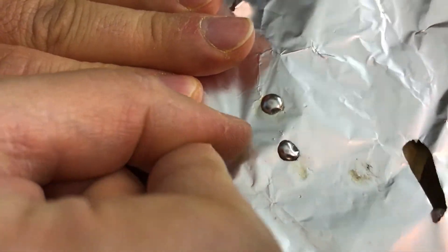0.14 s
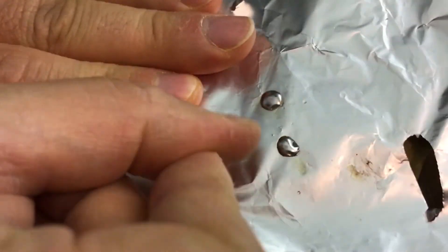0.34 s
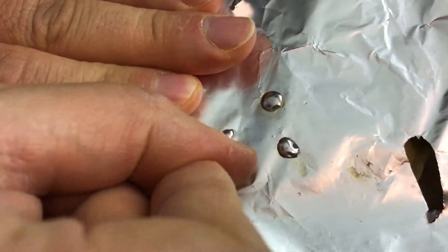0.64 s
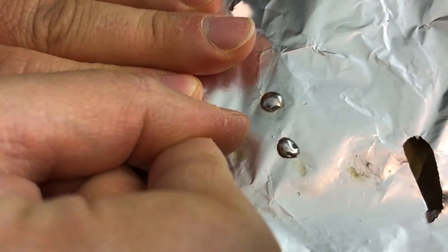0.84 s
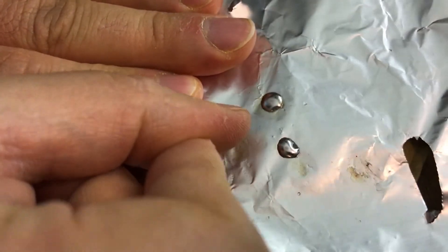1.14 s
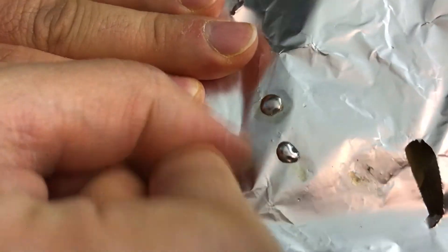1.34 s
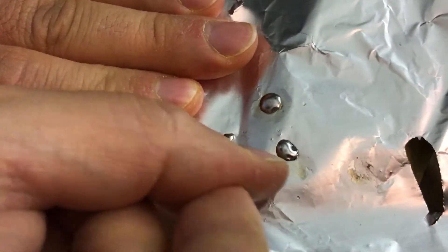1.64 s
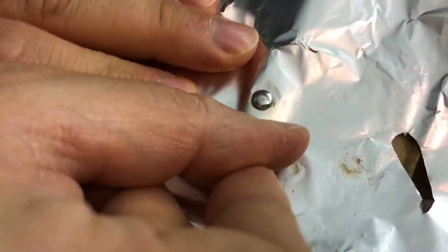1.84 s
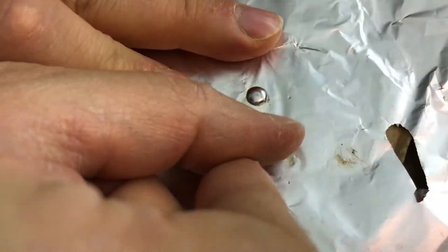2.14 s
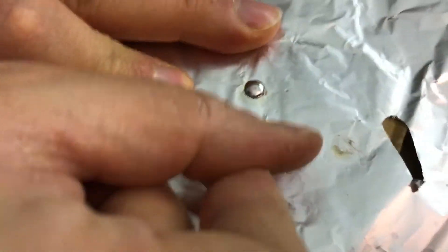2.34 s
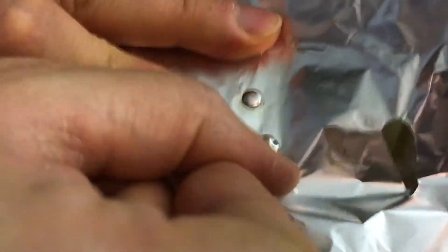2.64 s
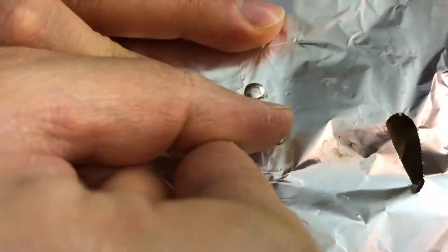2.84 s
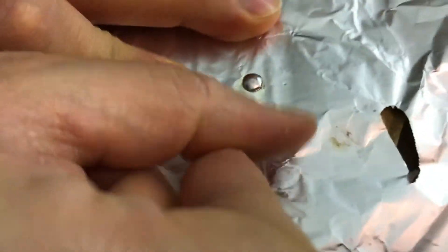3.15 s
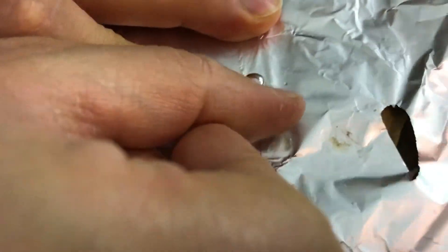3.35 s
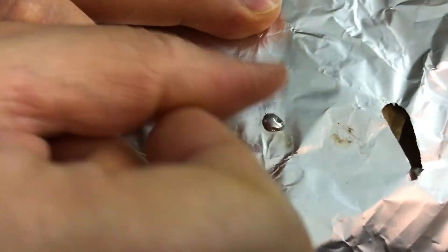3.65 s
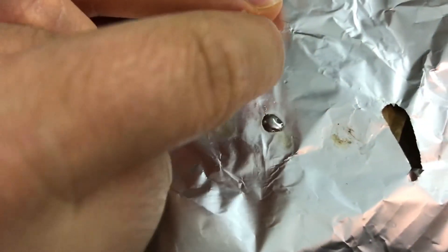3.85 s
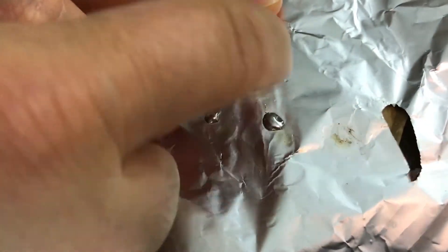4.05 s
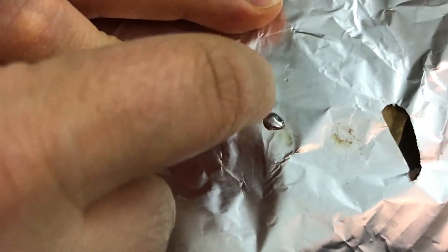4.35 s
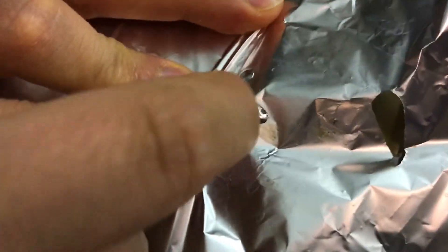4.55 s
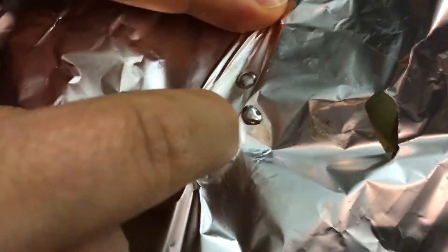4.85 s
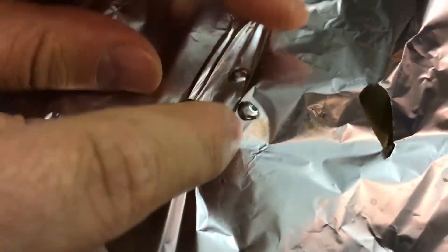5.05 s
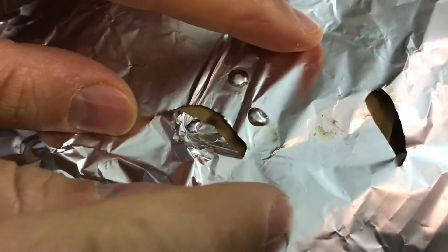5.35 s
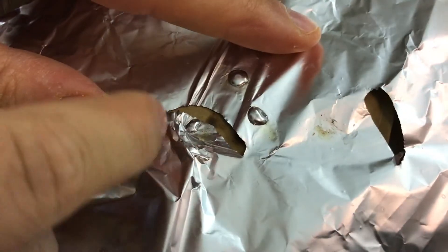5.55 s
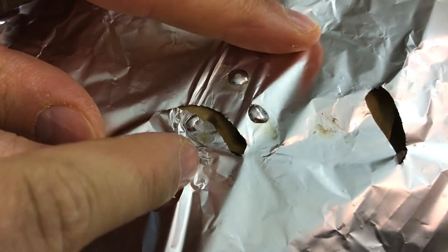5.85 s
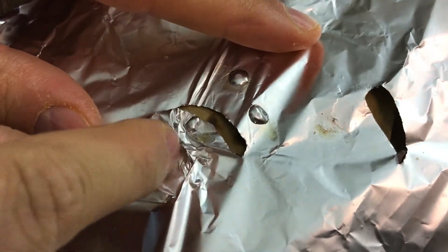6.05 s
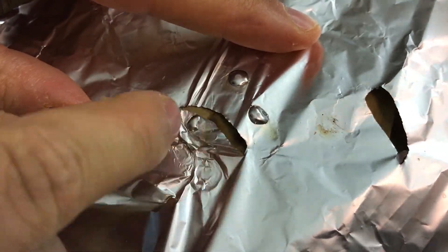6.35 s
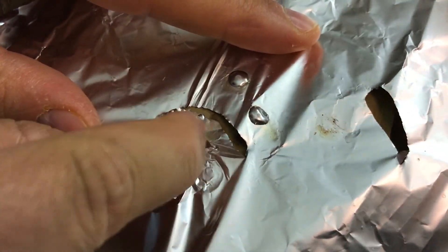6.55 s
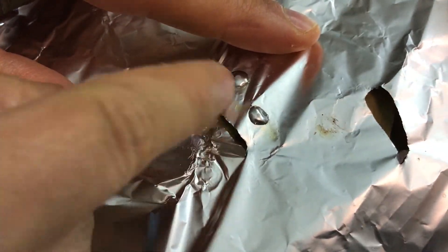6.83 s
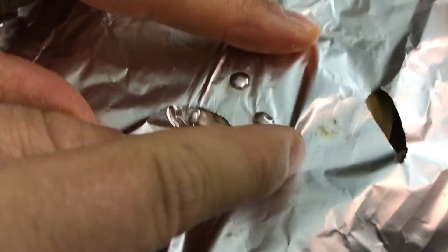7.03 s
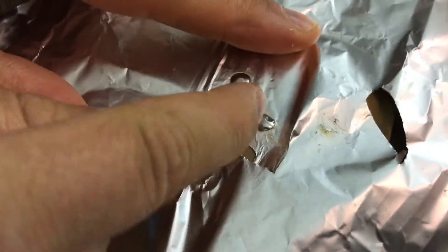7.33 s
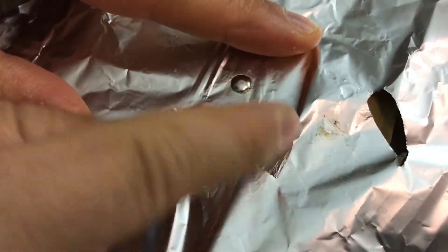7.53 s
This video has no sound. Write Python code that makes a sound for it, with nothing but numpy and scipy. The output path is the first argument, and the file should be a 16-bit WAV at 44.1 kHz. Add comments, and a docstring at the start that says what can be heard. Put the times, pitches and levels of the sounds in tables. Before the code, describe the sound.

Very close to the microphone, fingers work a sheet of kitchen foil on a workbench. Eight taps in the first three and a half seconds clack and thump, each with a splash of crinkle, between rubbing strokes. Then the foil is lifted and bent with sharper snaps, rips briefly near five seconds, and keeps crackling to the end. Faint steady hum, small dry room.

```python
"""Under a steady faint room hum, kitchen foil on a workbench snaps and crackles throughout, near the microphone.
Eight taps fall among the strokes in the first three and a half seconds: each thumps the bench, clacks,
squeezes out air and collapses the foil around the finger. Creases buckle and ring briefly as shaped noise bursts,
a sliding finger gives modulated noise, a few wide facets ring on one note, and a rip is a run of small jerks.
A short diffuse tail of the room follows the sounds of foil and bench."""
import sys
import numpy as np
from scipy import signal
from scipy.fft import rfft, irfft, next_fast_len
from scipy.io import wavfile
from scipy.ndimage import uniform_filter1d, map_coordinates

SR = 44100
rng = np.random.default_rng(int(sys.argv[2]) if len(sys.argv) > 2 else 0)


def wrap_up_sound(samples):
    """Save the sound to the file named by the first command line argument, as 16-bit audio."""
    columns = np.atleast_2d(samples).T
    # keep every value between -1 and 1, then stretch to whole-number steps
    tamed = np.clip(columns, -1, 1)
    steps = np.round(tamed * 32767).astype(np.int16)
    wavfile.write(sys.argv[1], SR, steps)


N = 339084
TOP_HZ = 15750  # upper band limit


def amp(db):
    """Logarithmic level: decibels to amplitude gain."""
    return 10 ** (np.asarray(db) / 20)


def unit(x):
    """Power normalisation: each row at rms 1."""
    return x / np.sqrt(np.mean(x ** 2, axis=-1, keepdims=True) + 1e-20)


def along(points, hz):
    """Logarithmic frequency scale: (f/Hz, value) points interpolated along it."""
    f, v = np.transpose(points)
    return np.interp(np.log(hz + 1), np.log(f), v)


def curve(rows):
    """Linear interpolation in time: (t/s, value) rows as one value per sample."""
    return np.interp(np.arange(N) / SR, *np.transpose(rows))


def filtered(x, gain):
    """Minimum-phase filtering: folding the cepstrum makes a causal filter of a gain per frequency."""
    m = 2 * next_fast_len(N // 2 + SR // 4)
    log_gain = np.log(np.maximum(gain(np.fft.rfftfreq(m, 1 / SR)), 1e-6))
    cepstrum = irfft(log_gain)
    # doubles positive times and removes negative ones
    fold = 1 + np.sign(m // 2 - np.arange(m)) * (np.arange(m) > 0)
    response = np.exp(rfft(cepstrum * fold))
    return irfft(rfft(x, m) * response, m)[:N]


def coloured(x, spectrum):
    """Spectral shaping: x takes on the spectrum, while white noise keeps its power."""
    in_band = amp(along(spectrum, np.arange(TOP_HZ)))
    norm = np.sqrt(np.mean(in_band ** 2) * TOP_HZ / (SR / 2))
    return filtered(x, lambda hz: amp(along(spectrum, hz)) / norm)


def place(times, sounds):
    """Superposition: the rows of sounds are summed, each starting at its time."""
    starts = np.round(np.maximum(times, 0) * SR).astype(int)
    index = starts[:, None] + np.arange(sounds.shape[1])
    return np.bincount(index.ravel(), sounds.ravel(), N)[:N]


def band(x, lo_hz, hi_hz):
    """Band limitation: a gentle band-pass."""
    return signal.sosfilt(signal.butter(2, [lo_hz, hi_hz], "bandpass", fs=SR, output="sos"), x)


def wobble(rate):
    """Band-limited fluctuation: a smooth random curve with rate knots a second."""
    knots = rng.standard_normal(int(N * rate / SR) + 4)
    return map_coordinates(knots, [np.arange(N) * rate / SR])


# background spectrum of the room: f/Hz, relative density level/dB
HUM_SPECTRUM = [(20, -39), (50, 5), (85, -13), (120, -3), (160, -14), (235, -2.5), (330, -11), (480, -24.5),
                (700, -20), (1200, -20.5), (4000, -29), (15000, -43.5)]


def background_hum():
    """Stationary noise: the room's steady background is white noise shaped by its spectrum."""
    return amp(-67.5) * coloured(rng.standard_normal(N), HUM_SPECTRUM)


def facets(count, ripple_db, tilt_db, size=2048):
    """Modal density: every facet has its own crowd of resonances and brightness (dB per octave), one per row."""
    hz = np.fft.rfftfreq(size, 1 / SR)
    ripple = signal.resample(rng.standard_normal((count, 64)), len(hz), axis=1)
    octaves = np.log2((hz + 1000) / 6000)
    gain = amp(ripple_db * ripple + tilt_db[:, None] * octaves)
    return unit(irfft(rfft(rng.standard_normal((count, size))) * gain))


def buckles(times, db, tilt_db, attack, t60, ring_db, ring_t60, ripple_db, brittle=0.3):
    """Snap-through: a facet flips with a crack, then bending waves die away; bright small facets die soonest."""
    ring = facets(len(times), ripple_db, tilt_db)
    t = np.arange(ring.shape[1]) / SR
    age = t * amp(brittle * tilt_db)[:, None]
    decay = amp(-60 * age / t60) + amp(ring_db - 60 * age / ring_t60)
    return place(times, amp(db)[:, None] * ring * (1 - np.exp(-t / attack)) * decay)


# the clearest creases that snap through: t/s, relative level/dB, brightness/(dB per octave)
CREASES = [(0.104, -47.5, 3.5), (0.189, -35, 1), (0.435, -47.0, -2), (0.551, -40, -0.5), (0.656, -49.5, 0),
           (0.685, -34.5, 7), (0.786, -44.0, 1), (0.852, -45, -0.5), (1.032, -50, 2.0), (1.061, -43, -1.5),
           (1.161, -43, -0.5), (1.22, -41, 4.5), (1.325, -43.5, -2), (1.359, -35.0, -2),
           (1.48, -40.5, -0.5), (1.675, -40.5, -0.5), (1.808, -29.0, 1.5), (1.833, -25.0, 1.5),
           (2.118, -38.5, -4), (2.161, -29.5, 1.5), (2.545, -29.5, 1), (2.598, -43, -4), (2.721, -41, 2.5),
           (2.833, -44.0, -1.0), (2.879, -36, 9), (3.272, -37.5, 1.5), (3.694, -34, 9.5),
           (3.838, -32, 10.5), (3.873, -35.5, 3.0), (3.904, -45, -1), (3.932, -42, -3), (3.952, -32.5, 2.5),
           (3.999, -39.5, -0.5), (4.077, -39.5, 1), (4.177, -34.5, 1.0), (4.223, -38.5, -0.5),
           (4.289, -35, 1), (4.41, -38, 2), (4.424, -30.5, 2.5), (4.435, -26.5, 1.5), (4.468, -23.5, -1.5),
           (4.678, -41, -2), (4.71, -39.5, -2.5), (4.818, -29, 1), (5.105, -30, 4), (5.182, -32, 5),
           (5.245, -39.5, -2.5), (5.263, -38, 6), (5.32, -36.5, 3), (5.35, -31.5, 2), (5.429, -42, 1),
           (5.479, -42.0, 4), (5.542, -37, 5), (5.605, -41, -1.5), (5.635, -33.5, 2.5), (5.653, -29, 1.5),
           (5.872, -34.5, 2), (5.935, -36, 1.5), (5.98, -27, -0.5), (6.065, -39.5, 0), (6.126, -38.5, -1.0),
           (6.206, -30.5, 0), (6.394, -50, -2.5), (6.436, -38, 1.5), (6.465, -41.5, 5), (6.5, -36.5, 0.5),
           (6.587, -37, 7), (6.659, -41.5, -0.5), (6.874, -36, 1.5), (6.951, -28, 7), (6.964, -24.5, 4),
           (6.988, -27.0, -2.5), (7.018, -24.5, 2.5), (7.287, -39, 0.5), (7.324, -31.5, 4), (7.345, -33, 6),
           (7.43, -30.5, -1.5), (7.457, -27.5, -0.5)]


def snaps(follow_db=-8, scatter_db=3):
    """Elastic instability: large creases give way singly, often with a weaker neighbour just before or after."""
    s, db, tilt_db = np.transpose(CREASES)
    chance = rng.uniform(0, 1, (len(s), 3))
    follows = chance[:, 0] < .55
    near = s - .006 + .021 * chance[:, 1]
    weaker = db + follow_db + scatter_db * (2 * chance[:, 2] - 1)
    times = np.r_[s, near[follows]]
    levels = np.r_[db, weaker[follows]]
    tilts = np.r_[tilt_db, tilt_db[follows]]
    return buckles(times - .0003, levels + 3.5, tilts, attack=0.00077, t60=0.024,
                   ring_db=-9, ring_t60=0.077, ripple_db=2.5)


RISE_DB_PER_S, FALL_DB_PER_S = 1100, 430  # how a stroke takes hold and lets go


def swell(start, length, db, fall):
    """Exponential growth and decay: a level in dB that rises quickly, holds, and falls by fall dB a second."""
    t = np.arange(N) / SR
    return db - RISE_DB_PER_S * np.maximum(start - t, 0) - fall * np.maximum(t - start - length, 0)


# strokes in which a finger rubs or bends the sheet: start t/s, length/s, relative crackle level/dB
FINGER_STROKES = [(0.159, 0.04, -42.5), (0.293, 0.04, -49), (0.358, 0.008, -50), (0.454, 0.014, -48),
                  (0.598, 0.02, -51), (0.684, 0.018, -38), (1.051, 0.02, -43.5), (1.341, 0.04, -44.5),
                  (1.554, 0.008, -55), (1.584, 0.016, -51), (1.715, 0.09, -40), (1.80, 0.165, -40.5),
                  (1.984, 0.072, -36.5), (2.089, 0.21, -48), (2.179, 0.03, -38.5), (2.32, 0.012, -47),
                  (2.463, 0.014, -49.5), (2.547, 0.13, -38.5), (2.662, 0.08, -49), (2.775, 0.012, -50),
                  (2.87, 0.06, -41), (2.989, 0.04, -52), (3.061, 0.045, -39), (3.307, 0.008, -53),
                  (3.378, 0.185, -39), (3.69, 0.03, -46.5), (3.949, 0.29, -51), (4.072, 0.035, -41),
                  (4.295, 0.054, -43), (4.421, 0.082, -36), (4.536, 0.012, -43), (4.661, 0.03, -49),
                  (4.698, 0.027, -38.5), (4.754, 0.05, -48), (4.804, 0.29, -43.5), (5.105, 0.2, -41),
                  (5.319, 0.15, -49), (5.508, 0.01, -46), (5.584, 0.008, -46), (5.603, 0.075, -43),
                  (5.756, 0.125, -50.5), (5.943, 0.018, -43), (6.133, 0.075, -41), (6.439, 0.07, -51),
                  (6.592, 0.035, -52), (6.68, 0.014, -40), (6.89, 0.06, -47), (6.954, 0.068, -35),
                  (7.091, 0.028, -49), (7.299, 0.1, -49), (7.466, 0.083, -41.5), (7.67, 0.01, -48)]
# the finger slaps the foil onto the bench; also played by the four tap sounds below:
# t/s, clack level/dB, final clack f/Hz, thump and air level/dB, splash level/dB (all levels relative)
FINGER_TAPS = [(0.2012, -15, 1713, -42, -26), (0.5612, -27.5, 1600, -44.5, -39.5),
               (0.937, -15, 1660, -41, -31), (1.3839, -14.5, 1730, -42, -34),
               (2.206, -17.5, 1939, -44, -29.5), (2.6139, -41, 3000, -39.5, -26),
               (3.0302, -13, 1940, -39, -29), (3.442, -24.5, 2920, -40.5, -26)]
REST_DB = -78  # effort of resting fingers
WAVER_DB, WAVER_HZ = 2.1, 35.08  # the fingers never press evenly
ARCH_DB = 5  # a stroke is this much stronger in its middle than at its ends
SETTLE_DB, SETTLE_DB_PER_S = -20, 94  # the foil settles after a stroke: level relative to it, fading
PRESS_LAG_S = 0.011  # the finger presses hardest this long after it lands
PRESS_DB, RELAX_DB_PER_S = -6, 215  # effort of a tap: peak relative to the splash column, and its ebb


def bending():
    """Mechanical drive: the effort on the sheet in dB is the strongest of strokes, taps and resting hand."""
    t = np.arange(N) / SR
    effort = np.full(N, float(REST_DB))
    for start, length, db in FINGER_STROKES:
        off_centre = np.clip(2 * (t - start) / length - 1, -1, 1)
        arch = ARCH_DB * (1 / 4 - off_centre ** 4)
        effort = np.maximum(effort, swell(start, length, db, FALL_DB_PER_S) + arch)
        effort = np.maximum(effort, swell(start, length, db + SETTLE_DB, SETTLE_DB_PER_S))
    for s, _, _, _, splash_db in FINGER_TAPS:
        press = swell(s + PRESS_LAG_S, 0, splash_db + PRESS_DB, RELAX_DB_PER_S)
        effort = np.maximum(effort, press)
    return effort + WAVER_DB * wobble(WAVER_HZ)


# sliding gives a fine grain, bending and tearing a coarse one: t/s, share of sliding before its ceiling
SLIDE_SHARE = [(0, 0.57), (1.6, 0.19), (1.9, 0.78), (3.55, 0.6), (3.85, 0.42), (6.7, 0.07), (7.0, 0.31)]


def sliding_share():
    """Power division: even a smooth slide keeps setting off some separate buckles."""
    return np.clip(curve(SLIDE_SHARE), 0, .7)


def crackle(bend_db, rate=380, colour_db=3.0):
    """Crackling noise: tiny unequal buckles grow stronger and more frequent with harder bending."""
    # rate is the most grains a second
    passed = np.cumsum(rate * np.clip(amp((bend_db + 40) / 2), .25, 1)) / SR
    count = int(passed[-1])
    at = np.searchsorted(passed, np.sort(rng.uniform(0, passed[-1], count)))
    size = amp(6.5 * np.clip(rng.standard_normal(count), -2, 2))
    # a large buckle relieves the stress that its neighbours would have released
    size /= np.sqrt(uniform_filter1d(size ** 2, size=13))
    db = bend_db[at] + 20 * np.log10(size) + 6
    tilt_db = colour_db * np.clip(rng.standard_normal(count), -2, 2)
    grains = buckles(at / SR, db, tilt_db, attack=.0001, t60=.007, ring_db=-17, ring_t60=.04, ripple_db=4.6)
    return grains * np.sqrt(1 - sliding_share())


def sliding(bend_db, slips_hz=450, wrinkles_hz=75, rough_db=2.0):
    """Stick-slip friction: skin slips too fast for single snaps to be told apart, and catches on wrinkles."""
    grip = amp(rough_db * (wobble(slips_hz) + wobble(wrinkles_hz)))
    return unit(grip * rng.standard_normal(N)) * amp(bend_db) * np.sqrt(sliding_share())


def rumble(bend_db, under_db=-26):
    """Structure-borne sound: the working hand shakes the bench into a dull rumble where it bends the sheet."""
    shaking = unit(band(rng.standard_normal(N), lo_hz=58.6, hi_hz=196))
    return amp(bend_db + under_db) * (1 - sliding_share()) * shaking


def ticks(times, db, colour_db=-0.74):
    """Small-scale buckling: brief rings of random brightness."""
    tilt_db = colour_db * (1 / 2 + np.clip(rng.standard_normal(len(times)), -1, 2))
    return buckles(times, db, tilt_db, attack=.0001, t60=.009, ring_db=-16, ring_t60=.05, ripple_db=4.5)


# stray creases: draws per second, level over the effort, largest level
STRAY_RATE, STRAY_OVER_DB, STRAY_MAX_DB = 14, 17.5, -34


def stray_creases(bend_db):
    """Threshold release: random creases stand out of the crackle only while the sheet is worked."""
    working = np.flatnonzero(bend_db > REST_DB + 15)  # a resting hand sets off no creases
    draws = rng.uniform(0, 1, int(STRAY_RATE * N / SR))
    stray = working[(draws * len(working)).astype(int)]
    return ticks(stray / SR, np.minimum(bend_db[stray] + STRAY_OVER_DB, STRAY_MAX_DB))


# the hand bumps the bench softly: t/s, relative level/dB
HAND_BUMPS = [(4.305, -56.5), (4.468, -51), (4.712, -53), (6.989, -51.5), (7.43, -53.5), (7.46, -50)]
# resonances of the bench top: f/Hz, relative level/dB, t60/s
BENCH_MODES = [(100, -22, 0.053), (186, -24.5, 0.078), (250, -21, 0.18), (712, -20.5, 0.07)]
PUSH_HZ, PUSH_LAG_S = 187, 0.00525  # the soft fingertip's push: its centre pitch, and when it peaks
REBOUND_S, REBOUND_DB = 0.0114, -13  # the bench kicks back once, weaker


def push(u):
    """Impulsive force: one rounded pulse centred on u = 0 s."""
    squared = (np.pi * PUSH_HZ * u) ** 2
    return (1 - 2 * squared) * np.exp(-squared)


def thumps(gain_db=9.5):
    """Impact excitation: each tap or bump pushes the bench, which rebounds and faintly rings in its modes."""
    s, db = np.transpose([(row[0], row[3]) for row in FINGER_TAPS] + list(HAND_BUMPS))
    t = np.arange(SR // 6) / SR - PUSH_LAG_S
    after = np.maximum(t, 0)
    chance = rng.standard_normal((len(s), len(BENCH_MODES), 2))
    ring = 0
    for k, (hz, level, t60) in enumerate(BENCH_MODES):
        decay = amp(level + 2 * chance[:, k, :1] - 60 * after / t60)
        pitch = hz * (1 + 0.02 * chance[:, k, 1:])
        ring = ring + decay * np.sin(2 * np.pi * pitch * after)
    knock = push(t) + amp(REBOUND_DB) * push(t - REBOUND_S) + ring
    return place(s, amp(db + gain_db)[:, None] * knock)


def clacks(t60=0.0085, glide=0.73, glide_time=0.00032):
    """Contact mechanics: foil hits the bench in a few cycles whose pitch drops as the contact widens."""
    s, db, hz, _, _ = np.transpose(FINGER_TAPS)
    t = np.arange(SR // 20) / SR
    # the pitch starts higher by a share of 2 * glide and settles on hz
    phase = 2 * np.pi * hz[:, None] * (t + glide * 2 * glide_time * (1 - np.exp(-t / glide_time)))
    ring = np.sin(phase) + 0.82 * rng.standard_normal(phase.shape)
    shape = (1 - np.exp(-t / 0.00057)) * amp(-60 * t / t60)
    return place(s + .0004, amp(db + 3.5)[:, None] * ring * shape)


def splashes():
    """Cascade buckling: just after a tap the foil around the finger collapses in a rush."""
    s, _, _, _, db = np.transpose(FINGER_TAPS)
    return buckles(s + 0.00082, db + 8.5, np.zeros(len(s)), attack=0.0023, t60=0.049,
                   ring_db=-28, ring_t60=0.094, ripple_db=6.5)


def puffs(t60=0.024):
    """Volume displacement: each tap squeezes trapped air from under the sheet in a short hollow knock."""
    s, _, _, db, _ = np.transpose(FINGER_TAPS)
    t = np.arange(SR // 12) / SR
    air = unit(band(rng.standard_normal((len(s), len(t))), lo_hz=394, hi_hz=1330))
    shape = (1 - np.exp(-t / 0.0013)) * amp(-60 * t / t60)
    return place(s + 0.001964, amp(db + 8.5)[:, None] * air * shape)


# wide facets that pop with a pitch of their own: t/s, level/dB, f/Hz
WIDE_FACETS = [(3.096, -35, 925), (4.538, -35.5, 1410), (5.98, -25.5, 1690), (6.817, -38, 4650),
               (7.431, -20, 4490)]


def pops(rough=2.5, t60=.022):
    """Single-mode resonance: a wide facet flips and rings for a moment on one slightly rough note."""
    s, db, hz = np.transpose(WIDE_FACETS)
    t = np.arange(SR // 12) / SR
    drift = rough * np.cumsum(rng.standard_normal((len(s), len(t))), axis=1) / 10
    tone = np.sin(2 * np.pi * hz[:, None] * t + drift)
    return place(s, amp(db)[:, None] * tone * amp(-60 * t / t60))


# the foil rips in a run of small jerks: start (s), length (s), jerks a second, middle level (dB)
RIP_START, RIP_LENGTH, RIP_RATE, RIP_DB = 4.83, 0.48, 68, -33.5


def rip():
    """Intermittent fracture: a tear advances in small jerks, uneven in time and level."""
    jerk = rng.uniform(-0.9, 1, (int(RIP_LENGTH * RIP_RATE), 2))
    times = RIP_START + (np.arange(len(jerk)) + .5 + jerk[:, 0] / 2) / RIP_RATE
    return ticks(times, RIP_DB + 3.5 * jerk[:, 1])


# the sheet's voice: f/Hz, relative density level/dB
FOIL_VOICE = [(100, -15.5), (450, -17.5), (950, -8), (1450, -4.5), (1900, 0), (2450, -8), (3200, 1),
              (3750, -2.5), (4550, 1), (5000, -3.5), (6400, 0.5), (7400, -3), (8500, -0.5), (10400, -4.5),
              (12000, -0.5), (15500, -2.5)]
# lifting of the foil: t/s, low-note gain level/dB
LIFT_GAIN = [(0, -5), (1.4, -3.5), (1.85, -3.5), (3.5, -4), (4.1, 2), (4.5, -1.5), (5.7, 3), (6.3, 1),
             (7.3, 1.5)]


def radiated(buckling):
    """Radiation efficiency: lifted foil radiates more of its low notes than foil pressed flat."""
    sheet = coloured(buckling, FOIL_VOICE)
    low = signal.sosfiltfilt(signal.butter(2, 2400, fs=SR, output="sos"), sheet)
    return sheet + (amp(curve(LIFT_GAIN)) - 1) * low


# reverberation of the room: f/Hz, t60/s
ROOM_DECAY = [(150, 0.33), (2000, 0.21), (15000, 0.047)]


def room(x):
    """Diffuse reverberation: the walls answer with a short noise tail whose decay depends on frequency."""
    hz, t, z = signal.stft(rng.standard_normal(SR // 3), SR, nperseg=256)
    decay = amp(-60 * t / along(ROOM_DECAY, hz)[:, None])
    tail = signal.istft(z * decay, SR, nperseg=256)[1]
    delayed = np.pad(tail / np.linalg.norm(tail), (SR // 200, 0))  # 5 ms before the first answer
    return signal.fftconvolve(x, delayed)[:N]


def scene():
    """Linear superposition: foil, bench and room add up at one microphone."""
    bend_db = bending()
    buckling = snaps() + crackle(bend_db) + sliding(bend_db) + stray_creases(bend_db) + splashes() + rip()
    near = radiated(buckling) + rumble(bend_db) + thumps() + clacks() + puffs() + pops()
    return (near + amp(-18.5) * room(near) + background_hum())[None]


def record(dry):
    """Transducer bandwidth: the microphone loses the deepest bass, the recorder all above its band limit."""
    thin = signal.sosfilt(signal.butter(4, 46, "highpass", fs=SR, output="sos"), dry)
    return signal.sosfilt(signal.ellip(10, .1, 80, TOP_HZ, fs=SR, output="sos"), thin)


dry = scene()
out = record(dry)
wrap_up_sound(out)
```